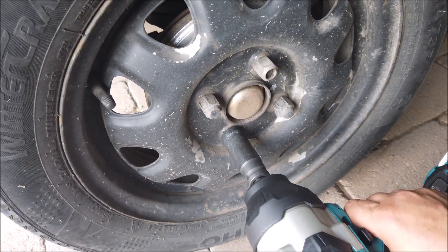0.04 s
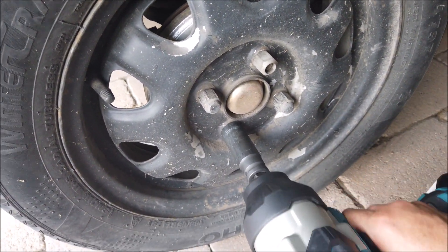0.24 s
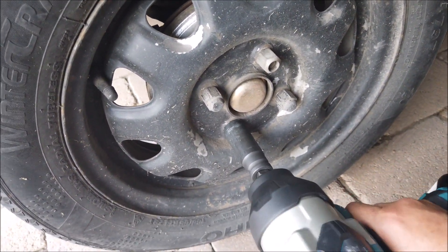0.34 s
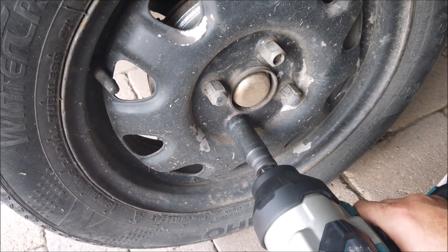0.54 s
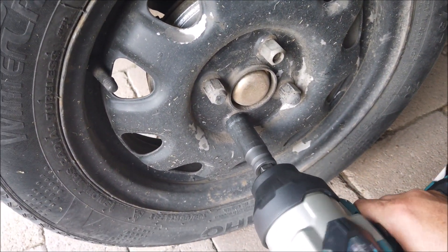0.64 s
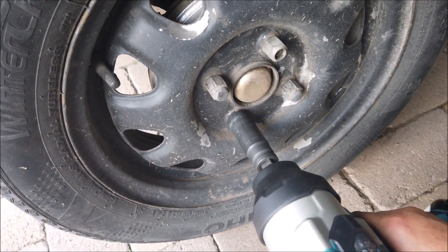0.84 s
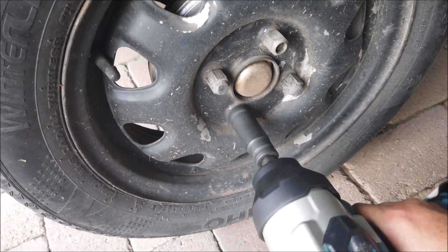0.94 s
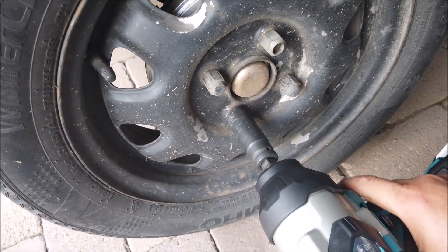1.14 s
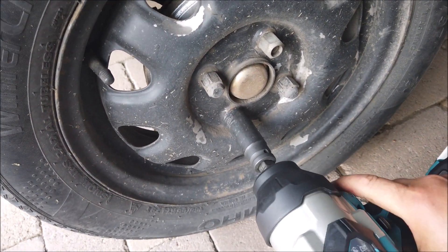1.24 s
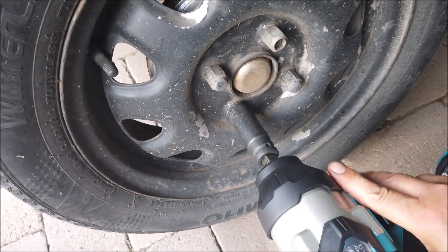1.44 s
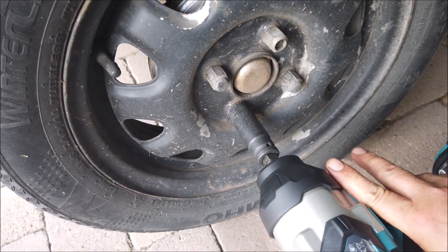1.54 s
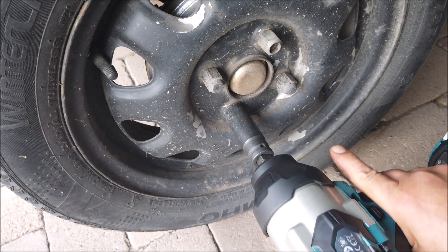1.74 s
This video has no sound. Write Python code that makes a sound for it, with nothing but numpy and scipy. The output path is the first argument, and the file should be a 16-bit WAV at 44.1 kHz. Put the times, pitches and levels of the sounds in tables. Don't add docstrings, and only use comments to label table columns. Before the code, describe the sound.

A cordless impact wrench hammers a wheel nut in two hard rattling bursts, then a click

```python
import sys
import numpy as np
from scipy import signal
from scipy.fft import rfft, irfft, next_fast_len
from scipy.io import wavfile
from scipy.ndimage import uniform_filter1d

SR = 44100
rng = np.random.default_rng(int(sys.argv[2]) if len(sys.argv) > 2 else 0)


def persist_wave(psi):
    counts = np.round(np.clip(psi, -1, 1) * 32767).astype(np.int16)
    wavfile.write(sys.argv[1], SR, np.atleast_2d(counts).T)


def ratio_of_db(decibels):
    return 10 ** (np.asarray(decibels, float) / 20)


N = 79380


def rms_one(x):
    return x / np.sqrt(np.mean(x ** 2) + 1e-20)


def at_hz(points, hz):
    return np.interp(np.log(hz), np.log(np.array(points)[:, 0]), np.array(points)[:, 1])


def filtered(x, order, hz, kind):
    return signal.sosfilt(signal.butter(order, hz, kind, fs=SR, output="sos"), x)


def drift(rate):
    r = np.exp(-2 * np.pi * rate / SR)
    return rms_one(signal.lfilter([1], [1, -2 * r, r * r], rng.standard_normal(N + 8000))[8000:])


def ring(x, hz, t60):
    r, w = ratio_of_db(-60 / (t60 * SR)), 2 * np.pi * hz / SR
    return signal.lfilter([0, np.sin(w)], [1, -2 * r * np.cos(w), r * r], x + 1e-18)


def banded(spectrum, lumps_db):
    out, together, white = 0, drift(29), rng.standard_normal((2, 2, N))
    lowest, highest = spectrum[0][0], spectrum[-1][0]
    edges = lowest * 2 ** np.arange(0, np.log2(highest / lowest) + .3, .5)
    for k, (low, high) in enumerate(zip(edges, edges[1:])):
        band = filtered(white[k % 2], 2, [low, min(high, .45 * SR)], "band")
        flicker_db = lumps_db * (.6 * together + .6 * drift(25))
        out = out + band * ratio_of_db(at_hz(spectrum, np.sqrt(low * high)) + flicker_db)
    return rms_one(out)


def add(out, s, piece):
    i = max(int(s * SR), 0)
    out[:, i:i + piece.shape[1]] += piece[:, :N - i]


def running_up():
    # (start [s], end [s])
    run_ups = [
        (.19, .256),
        (.762, .813),
    ]
    t = np.arange(N) / SR
    return uniform_filter1d(sum((t > a) & (t < b) for a, b in run_ups) * 1., size=200)


def trigger_pulls():
    # (time [s], rattle level [dB], wheel shake relative to rattle [dB])
    pulls = [
        [(0.2, -79, 13), (0.224, -37.5, -14), (0.266, -31.5, -3.5), (0.36, -38.5, 6.5), (0.442, -31.5, -2.5),
         (0.47, -36.5, 3), (0.548, -36, 3)],
        [(0.575, -41, 2.5), (0.61, -54, 5.5), (0.68, -62.5, 3.5), (0.746, -78, 6.5), (0.756, -72.5, 3.5)],
        [(0.758, -69.5, 4.5), (0.774, -46, -9.5), (0.83, -31.5, -2), (0.88, -39, 6), (0.9, -33.5, -0.5),
         (0.928, -34.5, 0.5), (0.966, -31.5, -2), (1.024, -34, -0.5), (1.1, -32.5, -13)],
        [(1.1, -35, -19.5), (1.162, -36.5, -14), (1.19, -36.5, -11), (1.238, -53.5, -4.5), (1.246, -41, -14.5),
         (1.262, -60, -2), (1.3, -80, 3), (1.42, -104, 10)],
    ]
    s, db, load = np.vstack(pulls).T
    t = np.arange(N) / SR
    off = -400 * (np.maximum(s[0] - t, 0) + np.maximum(t - s[-1], 0))
    free = running_up()
    rattle_db = np.interp(t, s, db) + off - 5.5 * free
    shake_db = np.interp(t, s, db + load) + off - 27 * free
    return rattle_db, shake_db


def strikes(rows, contacts_s, ring_s, trim_db):
    crack_s = .0015
    modes = [(1, 1, 1), (1.17, .6, .6), (.78, .5, .6), (1.42, .3, .4), (.4, .15, 1)]
    out, t = np.zeros((2, N)), np.arange(2000) / SR
    for s, db, hz, bright_db in rows:
        grit = rng.standard_normal((2, 2, len(t)))
        swell = np.sin(np.pi * np.minimum(t / contacts_s, 1) ** 0.49)
        contacts = (np.cos(2 * np.pi * hz * t) + 2.93 * grit[0]) * swell
        body = sum(share * ring(contacts, hz * ratio, length * ring_s) for ratio, share, length in modes)
        crack = signal.lfilter([1, 0, -1], [1, -.3], grit[1]) * t / crack_s * np.exp(1 - t / crack_s) / 3
        body = body * [[1], [rng.choice([-1, 1])]] / np.abs(body[0]).max()
        add(out, s, ratio_of_db(db + trim_db) * (body + ratio_of_db(bright_db) * crack))
    return filtered(out, 2, 700, "high")


def hammer_blows():
    # (time [s], peak level [dB], socket pitch [Hz], brightness [dB])
    blows = [(0.2312, -23, 2780, -12.5), (0.2561, -12.5, 2140, -5), (0.2814, -15, 3530, -7.5),
             (0.29, -13.5, 3600, -9), (0.3185, -17, 2550, -11.5), (0.3282, -19, 3000, -9.5),
             (0.3368, -18.5, 2300, -10), (0.3642, -19, 1940, -7), (0.3782, -17.5, 2810, -9),
             (0.3904, -19.5, 3760, -12), (0.4006, -18.5, 3400, -10.5), (0.4263, -17.5, 3470, -6.5),
             (0.4347, -8.5, 3510, -12), (0.4922, -18.5, 2620, -9), (0.5065, -18.5, 2900, -10),
             (0.5208, -17, 2080, -10.5), (0.8059, -17, 2660, -8.5), (0.8171, -11.5, 3560, -7),
             (0.8295, -19, 4260, -6.5), (0.8419, -18.5, 2700, -7.5), (0.855, -16, 3245, -9),
             (0.8665, -15.5, 2700, -8.5), (0.895, -15, 3500, -9), (0.9274, -16, 3360, -12.5),
             (0.9643, -10, 3090, -9.5), (1, -17, 2530, -7), (1.0035, -14.5, 3050, -7),
             (1.0361, -14, 3070, -11), (1.092, -16, 2600, -10.5), (1.1124, -17.5, 2590, -8.5),
             (1.2441, -29, 3070, -10.5)]
    return strikes(blows, contacts_s=.003, ring_s=.0078, trim_db=-3)


def further_blows():
    # (time [s], peak level [dB], socket pitch [Hz], brightness [dB])
    further = [(0.2598, -18, 4080, -8), (0.2683, -14.5, 3450, -9), (0.3024, -21, 2620, -13),
               (0.4442, -19, 3660, -10.5), (0.4621, -21, 3325, -10.5), (0.475, -19, 2133, -11),
               (0.5462, -19.5, 3000, -11.5), (0.8209, -16, 3530, -8.5), (0.8344, -14, 3400, -9.5),
               (0.8619, -16, 3290, -6.5), (0.8984, -15, 3550, -10.5), (0.9115, -16.5, 2880, -11),
               (0.9324, -16, 3440, -14), (0.968, -6, 3160, -12.5), (0.9769, -15.5, 4050, -10.5),
               (1.0636, -17.5, 3040, -10), (1.125, -20, 2580, -8), (1.1402, -22, 3230, -10.5),
               (1.157, -21.5, 3030, -13), (1.1768, -21, 3020, -10), (1.189, -23.5, 2830, -10)]
    # (time [s], peak level [dB], pitch [Hz], brightness [dB])
    touches = [
        (.2217, -28, 2720, -20),
        (.7781, -29, 2940, -24),
        (.7925, -21, 2750, -24),
    ]
    return strikes(list(further) + list(touches), contacts_s=.0023, ring_s=.0079, trim_db=-4)


def rattle(level_db):
    # (pitch [Hz], level per Hz [dB])
    colour = [(470, -41), (800, -23), (1290, -12.5), (1680, -5), (2570, -2), (3060, 1.5), (5310, -7),
              (10100, -9.5), (16000, -25)]
    contacts_per_s, spread_db, ring_s, hiss_share = 1800, 1.5, .0081, .65
    sizes = ratio_of_db(spread_db * np.minimum(rng.exponential(1, N), 2.6)) * rng.choice([-1, 1], (2, N))
    born = rng.random(N) < contacts_per_s / SR
    pitches, dealt = np.geomspace(900, 15000, 24), rng.integers(0, 24, N)
    rings = 0
    for k, hz in enumerate(pitches):
        clicks = sizes * born * (dealt == k)
        strength = ratio_of_db(at_hz(colour, hz)) * hz ** 0.59
        rings = rings + strength * ring(clicks, hz, ring_s * np.sqrt(3000 / hz))
    hiss = banded(colour, lumps_db=3.0)
    mix = np.sqrt(1 - hiss_share) * rms_one(rings) + np.sqrt(hiss_share) * hiss
    low = filtered(mix, 2, 4937, "low")
    bright_db = .15 * np.clip(level_db + 33.0, -25, 5) - 5 * running_up()
    mix = low + (mix - low) * ratio_of_db(bright_db)
    surge_db = 1.11 * drift(77)
    return ratio_of_db(level_db + 3 + surge_db) * mix


def whines():
    # (start [s], length [s], pitch [Hz], level [dB], width [Hz])
    tones = [(0.214, 0.042, 7810, -50, 200), (0.508, 0.068, 7250, -40, 303), (.76, .03, 7810, -55, 200),
             (1.748, .026, 2430, -78, 400), (.775, 0.032, 4600, -41, 700), (.901, 0.16, 7210, -39, 1112),
             (1.048, 0.12, 9910, -40.5, 1140), (1.673, .011, 3390, -67, 250), (1.664, .03, 5200, -74, 2500),
             (1.735, .064, 3300, -80, 1200), (.196, .058, 9800, -60, 300), (.196, .026, 7800, -68, 300),
             (1.29, .12, 3200, -78, 1500), (1.667, 0.018, 2150, -65, 250), (1.687, .042, 2186, -74, 200),
             (.133, .012, 3300, -68, 1500), (.154, .01, 2700, -66, 900), (1.26, .09, 8760, -78, 60),
             (1.26, .06, 14800, -80, 60), (1.644, 0.057, 8600, -75, 2880), (1.664, 0.055, 3100, -70, 1600),
             (0.00082, 0.076, 2768, -78, 1600), (.132, 0.04, 9810, -87.5, 804),
             (0.773, 0.036, 3460, -36.5, 2200), (1.032, 0.19, 3030, -36, 840),
             (.219, 0.033, 2900, -42.5, 3200)]
    out = np.zeros((2, N))
    for s, length, hz, db, width in tones:
        noise = rng.standard_normal((2, SR // 4))[:, :int(length * SR)]
        narrow = ring(ring(noise, hz, 1.6 / width), hz, 1.6 / width)
        add(out, s, ratio_of_db(db) * np.hanning(noise.shape[1]) ** .4 * rms_one(narrow))
    return out


def wheel_shake(shake_db):
    # (pitch [Hz], level per Hz [dB])
    colour = [(13, -27), (22, 16), (91, 8.5), (372, 8.5), (429, 9), (528, 3), (1000, -2.5), (1300, -36.5),
              (2200, -120)]
    return ratio_of_db(shake_db - 4.5) * banded(colour, lumps_db=4.5)


def wheel_jolts():
    # (time [s], peak level [dB], pitch [Hz])
    thuds = [(0.268, -24, 390), (0.289, -20, 446), (0.304, -40.5, 80.7), (0.328, -33.5, 269),
             (0.338, -31, 94.2), (0.405, -29, 98), (0.446, -22.5, 842), (0.4695, -16.5, 663),
             (0.493, -28, 199.4), (0.506, -29.5, 182), (0.812, -26.5, 307), (0.843, -28.5, 464),
             (0.867, -30, 116), (0.901, -29.5, 101), (0.968, -23.5, 425), (1.005, -25.5, 426)]
    out, t = np.zeros((2, N)), np.arange(4000) / SR
    for s, db, hz in thuds:
        shape = (1 - np.exp(-2.5 * hz * t)) * np.exp(-np.log(1000) * hz * t / 6.4)
        tone = np.sin(2 * np.pi * hz * t + [[0], [rng.uniform(0, 2 * np.pi)]])
        add(out, s, ratio_of_db(db - 5.5) * tone * shape / shape.max())
    return out


def rim(shake_db):
    # (pitch [Hz], level [dB], time to fall by 60 dB [s])
    modes = [(37.5, -55, 1.1), (67.74, -53, 0.65), (205, -63, 0.49), (260, -64, 0.78), (297, -61, 0.29),
             (344, -63, 0.3), (437, -61, 1.25), (502, -67, .3)]
    out, t = np.zeros((2, N)), np.arange(N) / SR
    for hz, db, t60 in modes:
        stored = signal.lfilter([1], [1, -ratio_of_db(-120 / (t60 * SR))], ratio_of_db(2 * shake_db))
        tone = np.sin(2 * np.pi * hz * t + [[0], [np.pi / 2]] + 0.65 * drift(11))
        out += ratio_of_db(db + 1.8 * drift(10)) * rms_one(np.sqrt(stored)) * tone
    return out


def switch_click():
    # (pitch [Hz], level [dB])
    modes = [(1400, -62), (2250, -51), (2810, -47.5), (3360, -55), (4700, -56), (6500, -70), (8600, -60),
             (9700, -61), (10600, -56), (14500, -66)]
    start_s, length_s = 1.6594, .007
    out, t = np.zeros((2, N)), np.arange(int(length_s * SR)) / SR
    tones = 0
    for hz, db in modes:
        phase = [[rng.normal(0, 1)], [np.pi / 2]]
        tones = tones + ratio_of_db(db) * np.cos(2 * np.pi * hz * (t - t[-1] / 2) + phase)
    grit = ratio_of_db(-62) * signal.lfilter([1, 0, -1], [1, -.3], rng.standard_normal((2, len(t))))
    add(out, start_s, (tones + grit) * np.hanning(len(t)) ** 2.4)
    return out


def quiet_yard():
    # (pitch [Hz], level per Hz [dB])
    colour = [(13, -26), (22, 9), (91, -4), (284, -23.5), (1710, -32.5), (3760, -37.5), (10200, -50.5),
              (12000, -56), (15600, -84.5), (22000, -120)]
    return ratio_of_db(-64.5) * banded(colour, lumps_db=1.2)


def echoes(x):
    t = np.arange(SR // 2) / SR
    tail = rng.standard_normal((2, len(t))) * ratio_of_db(-60 * t / .25) * (t > .006)
    tail = filtered(tail, 1, 4000, "low")
    tail = tail / np.sqrt(np.sum(tail ** 2) / 2)
    return ratio_of_db(-25) * signal.fftconvolve(x[None], tail, axes=1)[:, :N]


def pair(x):
    # (pitch [Hz], side minus middle [dB])
    spread = [(60, -7), (380, -7), (700, -3), (1290, -3), (2380, -8), (4400, -4), (8120, -2), (15000, -1)]
    size = next_fast_len(N + 4096)
    gain = ratio_of_db(at_hz(spread, np.fft.rfftfreq(size, 1 / SR) + 1))
    side = irfft(rfft(x[1], size) * gain, size)[:N]
    return np.array([x[0] + side, x[0] - side])


def scene():
    rattle_db, shake_db = trigger_pulls()
    running = filtered(rattle(rattle_db) + whines(), 3, 1150, "high")
    metal = hammer_blows() + further_blows() + running
    wheel = wheel_shake(shake_db) + wheel_jolts()
    near = metal + wheel + switch_click()
    return pair(near + rim(shake_db) + quiet_yard()) + echoes(near[0])


def top_cut(x):
    return signal.sosfilt(signal.butter(12, 16780, fs=SR, output="sos"), x)


def record(dry):
    mix = signal.sosfilt(signal.cheby2(12, 70, 17000, fs=SR, output="sos"), dry)
    return top_cut(mix)


dry = scene()
out = record(dry)
persist_wave(out)
```